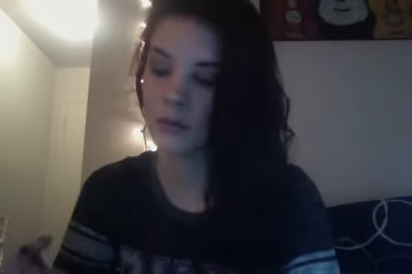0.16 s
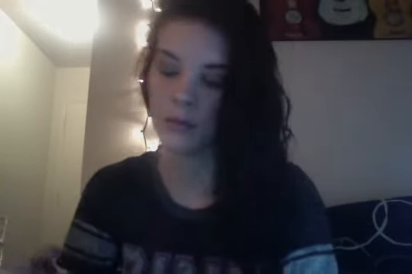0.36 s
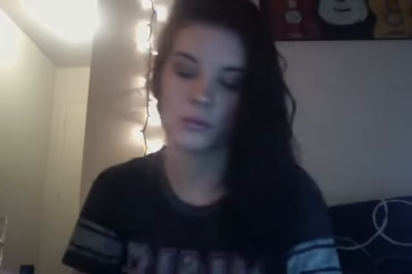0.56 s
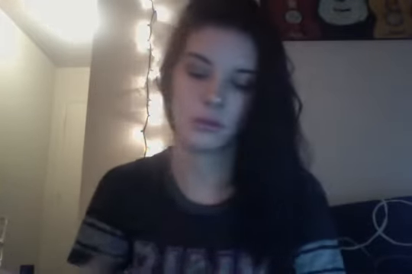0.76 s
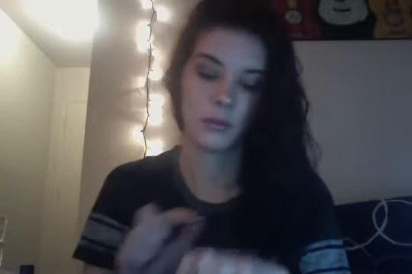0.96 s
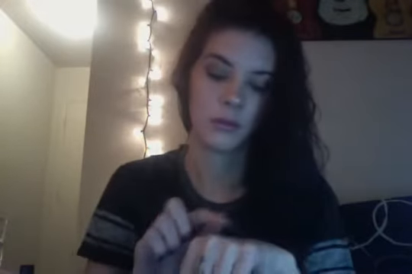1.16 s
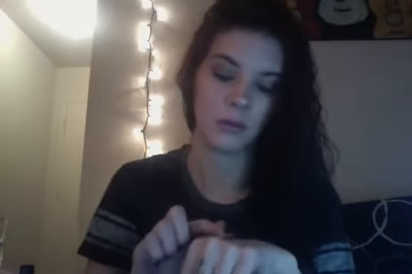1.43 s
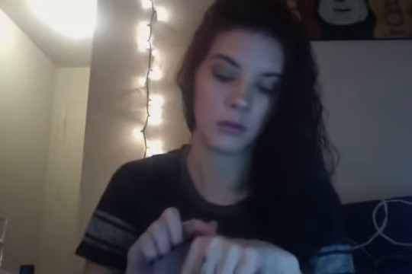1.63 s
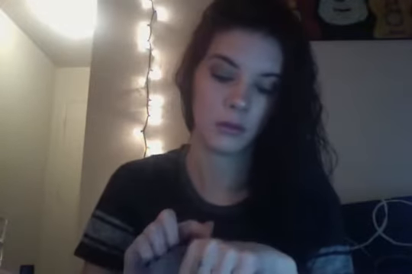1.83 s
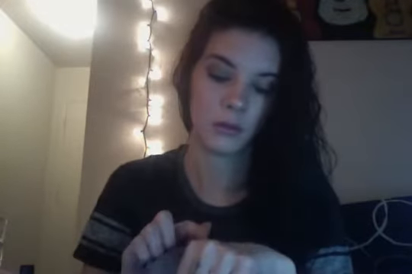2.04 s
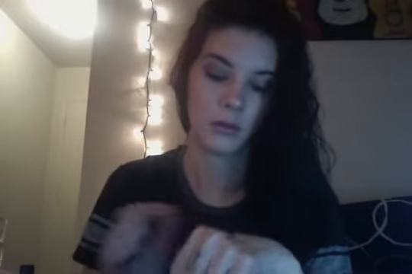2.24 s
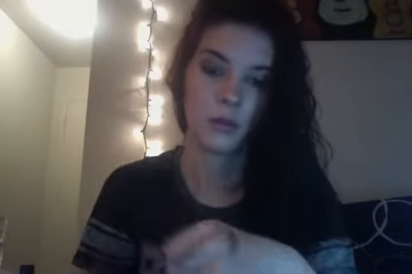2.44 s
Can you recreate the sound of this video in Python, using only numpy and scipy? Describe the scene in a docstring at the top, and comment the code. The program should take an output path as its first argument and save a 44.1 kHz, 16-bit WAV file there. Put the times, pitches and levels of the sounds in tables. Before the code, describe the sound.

Hard plastic cosmetics case knocks on a desk: a bright snapping clatter, a light tap, a second lower clack, all within half a second. Then near silence with faint fan hiss, heard by a laptop microphone in a small room.

```python
"""In a small quiet bedroom a laptop fan whirrs and speeds up: rushing noise plus tones locked to its shaft. Its
electronics hum, whine and give a pulsing peep, all made of sine tones; the peep ends at 2.16 s. At 0.2 s a
plastic make-up palette clacks and rattles on the desk: short contacts ring its parts and the desk. A fingernail
taps another object nearby at 0.36 s, the palette clacks again at 0.52 s, and faint puffs of treble noise rustle
from 1.17 s. The laptop's noise suppressor opens on each clack and closes slowly."""
import sys
import numpy as np
from scipy import signal
from scipy.fft import rfft, irfft
from scipy.io import wavfile
from scipy.ndimage import uniform_filter1d

SR = 44100
rng = np.random.default_rng(int(sys.argv[2]) if len(sys.argv) > 2 else 0)


def dump(signal):
    """Clip the signal to [-1, 1] and save it as 16-bit WAV at the path in sys.argv[1]."""
    limited = np.clip(np.atleast_2d(signal).T, -1, 1)
    pcm = np.round(limited * 32767).astype(np.int16)
    wavfile.write(sys.argv[1], SR, pcm)


def invert_db(level):
    """Linear amplitude ratio for a level in decibels (20 dB per decade), elementwise."""
    return 10 ** (np.asarray(level, dtype=float) / 20)


N = 114660  # length of the sound in samples

# Colour of the fan's rushing air: (frequency [Hz], relative level per Hz [dB])
AIR_COLOUR = [(30, -50.5), (60, -22.5), (101, -6.5), (171, -7.5), (226, -2), (491, -3.5), (615, 0.5),
              (1210, -6.5), (1480, -5.5), (1630, -9.5), (2400, -9), (2900, -11.5), (4300, -16.5),
              (4900, -26), (6200, -24.5), (7100, -29.5), (8300, -24), (9000, -27), (9400, -33.5),
              (12000, -37.5), (16000, -49)]
# Turning speed of the fan shaft: (time [s], turns per second [Hz])
SHAFT_SPEED = [(0, 75.8), (.5, 76.15), (1.3, 76.5), (1.9, 76.85), (2.6, 77.55)]
# Fan tones: (multiple of the shaft speed, level [dB])
FAN_TONES = [(3, -72), (4, -79.5), (8, -72.5), (9, -72.5), (10, -79), (11, -77), (14, -78.5), (19, -71.5),
             (38, -78)]
# Electronic whines: (multiple of WHINE_HZ, level [dB])
WHINE_TONES = [(3, -84), (5, -89), (10, -91), (11, -90.5), (12, -94.5), (13, -91), (14, -85.5), (15, -92),
               (16, -95), (17, -96.5), (18, -93.5), (20, -101)]
# Palette contacts: (time [s], length [ms], desk [dB], case [dB], lid [dB], lid tilt [dB per octave],
# tick [dB], tick tilt [dB per octave])
CONTACTS = [(0.205, 2.8, -58, -54.5, -37.5, -15, -72, 11), (0.2073, 1.2, -29, -10, -7.5, 6, -11.5, 3.5),
            (0.2188, 3.4, -56.5, -49, -36, 3, -19.5, 0), (0.2219, 2.13, -24, -16.5, -11.5, 3.5, -26, -4),
            (.2262, 2.4, -37.5, -18.5, -24, -10, -44, 3.5),
            (.2310, 1.15, -32.5, -33, -19.5, 2.5, -19.5, -4), (0.2341, 2.3, -42, -26, -21.5, 0, -41, 4),
            (.2370, 31, -56.5, -36.5, -44, -3, -48, 2), (.2450, 3., -33, -30, -36, 4, -45, 0),
            (0.2568, 2.8, -40.5, -37.5, -29, -2, -31, -4), (.2638, 3.6, -55, -54, -30.5, 5, -24.5, 2.5),
            (0.269, 1.3, -45, -43, -37, -3, -57, 0), (.2745, 2.7, -44, -45, -42, -2, -43, -2),
            (0.2875, 6.5, -60, -45, -45, 4, -37, -4), (.3030, 4.4, -67, -44, -50, 3, -51, -0.5),
            (0.5193, 1.97, -19.5, -30, -21, -17.5, -22, -7.5),
            (.5230, 24, -67.5, -72.5, -39, -2, -41, -12.5), (.5400, 44, -61.5, -58, -41, -5.5, -48.5, -8),
            (.5290, 1.5, -30.5, -47, -36, -5.5, -48, -4), (0.5325, 2, -25, -52, -40.5, 2.5, -44.5, -4.5),
            (.5460, 3.5, -43.5, -40, -50, -10, -58.5, 1), (.5560, 5., -42.5, -31, -48, -10.5, -64, 1),
            (.5665, 3., -32.5, -40, -55, -7, -47.5, 2.5)]
# Ringing modes of the desk: (frequency [Hz], relative level [dB], 60 dB decay [s])
DESK_MODES = [(238, -17, 0.11), (400, -3.5, 0.0085), (490, 13.5, 0.025), (560, 3.5, 0.017),
              (1200, -17, .01)]
# Ringing modes of the palette's case: (frequency [Hz], relative level [dB], 60 dB decay [s])
CASE_MODES = [(680, -18, .025), (761, -0.5, .04), (851.5, -4.5, 0.028), (1023, -17, 0.028)]
# Ringing modes of its lid: (frequency [Hz], relative level [dB], 60 dB decay [s])
LID_MODES = [(1400, -14, .012), (1620, -3, 0.011), (1850, -3, 0.014), (2160, -4, 0.03), (2380, -5, .011),
             (2667, -3.5, 0.015), (3142, 0, 0.012), (3610, 1, 0.01), (4250, -1.5, 0.0072),
             (4774, -9, 0.008)]
# Ringing modes of its ticking latch: (frequency [Hz], relative level [dB], 60 dB decay [s])
TICK_MODES = [(5007, -5, 0.0064), (5950, -3.5, .008), (6670, -2.5, 0.007), (7397, -1.5, 0.0055),
              (8370, -1.5, 0.0051), (9232, 0, 0.004), (10520, -1.5, .005), (11600, -5, .006),
              (12710, -7, 0.0035), (14690, -7.5, .002)]
# Low desk modes: (frequency [Hz], relative level [dB], 60 dB decay [s])
THUMP_MODES = [(84, 0.59, 0.53), (109, -2.6, 0.098)]
# Latch snaps: (time [s], peak level [dB])
LATCH_SNAPS = [(.2078, 0), (.5202, -20)]
# Modes rung by the fingernail tap on another object: (frequency [Hz], relative level [dB], 60 dB decay [s])
TAP_MODES = [(445, -12, 0.027), (681.5, 1, 0.015), (1843, 0.5, 0.018), (2320, -3, 0.02), (3230, -6, 0.015),
             (4650, -21, 0.028), (6000, -18, 0.013), (11000, -18.5, 0.019)]
# Room tail bands: (frequency [Hz], level [dB], 60 dB decay [s])
ROOM_BANDS = [(400, -31.5, 0.2), (720, -25.5, .21), (1410, -23, .22), (2900, -23.5, .2),
              (5200, -22.5, 0.25), (8000, -26.5, 0.24), (13300, -25, 0.24)]
# Faint treble rustles: (time [s], length [s], frequency [Hz], level [dB])
RUSTLES = [(1.166, 0.028, 8620, -75.5), (1.29, 0.027, 8500, -84), (2.282, 0.03, 8300, -78)]

AIR_DB, SHAFT_WOBBLE = -62, 0.0007  # wobble is a fraction of the speed
WHINE_HZ = 567.43
HUM_HZ, HUM_DB = 120, -80.5
PEEP_HZ, PEEP_DB, PEEP_FLICKER_DB, PEEP_ENDS_S = 8000, -81, 2, 2.16
PEEP_PULSE_HZ, PEEP_ON_SHARE = 15.05, 0.62  # it switches on and off
SCATTER_DB, GRIT_MS = 1.2, 0.2  # spread of mode strengths, memory of the grit
RATTLE_OVER_MS, RATTLE_PER_S, RATTLE_DB = 10, 500, 7  # long contacts break into uneven knocks
BODY_LAG_MS, BODY_PUSH_MS = 1.5, 0.44  # delay and width of the soft push into case and desk
RADIATES_HZ = 287  # below this the palette radiates little
THUMP_DB = -45  # relative to the case and desk levels
SNAP_HZ, SNAP_MS = 6500, 0.065
TAP_S, TAP_MS, TAP_DB = 0.3597, 1.99, -30
ROOM_GAP_MS = 4.0  # time over which the tail fades in
OPEN_DB, CLOSED_DB, HOLD_S, CLOSE_S = -51, -7, 0.046, 0.56  # noise suppressor
RING_SAMPLES, PUSH_SAMPLES = 4096, 2048


def walk(rate):
    """Smooth random wander: levels held for 1 / rate seconds and averaged twice, with a spread near 1."""
    hold = int(SR / rate)
    steps = np.repeat(rng.standard_normal(N // hold + 1), hold)
    return 1.3 * uniform_filter1d(uniform_filter1d(steps, hold), hold)[:N]


def colour(x, hz, db):
    """Shape a spectrum through (Hz, dB) points."""
    f = np.maximum(np.arange(len(x) // 2 + 1) * SR / len(x), 1)
    return irfft(rfft(x) * invert_db(np.interp(np.log(f), np.log(hz), db)), len(x))


def tone(phase, db):
    """Sine with a random starting phase and an rms level in dB."""
    return np.sqrt(2) * invert_db(db) * np.sin(phase + 2 * np.pi * rng.random())


def fan():
    """Rushing air is coloured noise; shaft and blade tones are multiples of one rising, wobbling speed."""
    air = colour(rng.standard_normal(N), *np.array(AIR_COLOUR).T)
    out = air / air.std() * invert_db(AIR_DB + 0.3916 * walk(12))
    speed_hz = np.interp(np.arange(N) / SR, *np.array(SHAFT_SPEED).T) * (1 + SHAFT_WOBBLE * walk(7.9))
    turn = 2 * np.pi * np.cumsum(speed_hz) / SR
    for multiple, db in FAN_TONES:
        out = out + tone(multiple * turn, db)
    return out


def electronics():
    """Steady whines at multiples of one pitch, a pulsing peep, and mains hum with a wandering level."""
    t, whines = np.arange(N) / SR, 0
    for multiple, db in WHINE_TONES:
        whines = whines + tone(2 * np.pi * multiple * WHINE_HZ * t, db)
    peep = tone(2 * np.pi * PEEP_HZ * t + 0.5 * walk(60), PEEP_DB - PEEP_FLICKER_DB * walk(35))
    pulse = np.cos(2 * np.pi * PEEP_PULSE_HZ * t) - np.cos(np.pi * PEEP_ON_SHARE)
    ending = np.clip((PEEP_ENDS_S - t) / 0.03, 0, 1)
    hum = tone(2 * np.pi * HUM_HZ * t, HUM_DB + 3.9 * walk(5))
    return whines + peep * np.clip(4 * pulse, 0, 1) * ending + hum


def push_shape(k, ms):
    """Force over time k in ms: an arch of the given length, uneven if long, or for ms = 0 a soft late push."""
    knocks = rng.standard_normal(64)[(k * RATTLE_PER_S / 1000).astype(int)]
    if ms == 0:
        return np.exp(-0.5 * ((k - BODY_LAG_MS) / (BODY_PUSH_MS / 4)) ** 2)
    arch = np.sin(np.pi * np.clip(k / ms, 0, 1))
    return arch * invert_db(RATTLE_DB * knocks) if ms > RATTLE_OVER_MS else arch


def ring(modes, ms=0, tilt_db=0):
    """Fading modes of scattered strength, each shaken by its own grit, or all by one soft push; peak 1."""
    t, total = np.arange(RING_SAMPLES) / SR, 0
    k = t[:PUSH_SAMPLES] * 1000  # time in ms
    shape = push_shape(k, ms)
    smoother = np.hanning(int(4 * GRIT_MS * SR / 1000))
    for hz, db, t60 in modes:
        scatter, *noise = rng.standard_normal(PUSH_SAMPLES + 1)
        grit = signal.fftconvolve(noise, smoother, "same")
        carrier = np.cos(2 * np.pi * hz * k / 1000 + noise[0])  # the first noise value also sets the phase
        push = shape * grit * carrier if ms else shape
        fading_sine = np.exp(-np.log(1000) * t / t60) * np.sin(2 * np.pi * hz * t)
        one = signal.fftconvolve(fading_sine, push)[:len(t)]
        level_db = db + SCATTER_DB * scatter + tilt_db * np.log2(hz / modes[0][0])
        total = total + one / np.abs(one).max() * invert_db(level_db)
    return total / np.abs(total).max()


def palette():
    """Each contact puts grit into lid and latch, then a softer push into case and desk; little bass radiates."""
    out, low, t = np.zeros(N), np.zeros(N), np.arange(N) / SR
    fade = np.cos(np.linspace(0, np.pi / 2, RING_SAMPLES))
    for s, ms, desk_db, case_db, lid_db, lid_tilt_db, tick_db, tick_tilt_db in CONTACTS:
        span = slice(int(s * SR), int(s * SR) + RING_SAMPLES)
        out[span] += invert_db(desk_db) * ring(DESK_MODES) + invert_db(case_db) * ring(CASE_MODES)
        out[span] += invert_db(lid_db) * ring(LID_MODES, ms, lid_tilt_db)
        out[span] += invert_db(tick_db) * ring(TICK_MODES, ms, tick_tilt_db)
        thump_gain = (invert_db(case_db) + 2.5 * invert_db(desk_db)) * invert_db(THUMP_DB)
        low[span] += thump_gain * ring(THUMP_MODES, 3.3) * fade
    out = out + latch_snaps(t)
    tap = int(TAP_S * SR)
    out[tap:tap + RING_SAMPLES] += nail_tap()
    bass_cut = signal.butter(3, RADIATES_HZ, "highpass", fs=SR, output="sos")
    return signal.sosfilt(bass_cut, out) + low


def latch_snaps(t):
    """Each snap is a very short smooth burst of a treble tone."""
    out = np.zeros(N)
    for s, db in LATCH_SNAPS:
        burst = np.exp(-((t - s) * 1000 / SNAP_MS) ** 2)
        out += invert_db(db) * np.cos(2 * np.pi * SNAP_HZ * (t - s)) * burst
    return out


def room(x):
    """Diffuse echoes: bands of noise that fade in quickly and die away, each at its own rate."""
    t, tail = np.arange(SR // 2) / SR, 0
    for hz, db, t60 in ROOM_BANDS:
        band_pass = signal.butter(2, [hz / 1.3, min(hz * 1.4, 20000)], "bandpass", fs=SR, output="sos")
        band = signal.sosfilt(band_pass, rng.standard_normal(len(t)))
        fade = np.exp(-np.log(1000) * t / t60) * np.clip(t * 1000 / ROOM_GAP_MS, 0, 1) ** 2
        tail = tail + invert_db(db) * band / band.std() * fade / np.sqrt(np.sum(fade ** 2))
    return x + signal.fftconvolve(x, tail)[:N]


def nail_tap():
    """One fingernail tap on another object rings its own set of modes through a short gritty contact."""
    return invert_db(TAP_DB) * ring(TAP_MODES, TAP_MS)


def rustles():
    """Short faint puffs of narrow treble noise."""
    t, out = np.arange(N) / SR, 0
    for s, length, hz, db in RUSTLES:
        band_pass = signal.butter(2, [hz * 0.95, hz * 1.05], "bandpass", fs=SR, output="sos")
        noise = signal.sosfilt(band_pass, rng.standard_normal(N))
        out = out + invert_db(db) * noise / noise.std() * np.exp(-((t - s) / (length / 2)) ** 2)
    return out


def scene():
    """Palette in the room over the laptop's own noise and the rustles, as one channel."""
    return (room(palette()) + fan() + electronics() + rustles())[None]


def roll_off(x):
    """The treble ends steeply here."""
    return signal.sosfilt(signal.butter(12, 16540, fs=SR, output="sos"), x)


def record(dry):
    """The suppressor opens above a threshold, holds, then sinks back; both ends of the range are cut."""
    t = np.arange(N) / SR
    power = uniform_filter1d(dry[0] ** 2, size=221, origin=40)  # 5 ms average, leaning to the past
    loud = power > invert_db(OPEN_DB) ** 2
    since = t - np.maximum.accumulate(np.where(loud, t, -9))  # seconds since last loud; starts closed
    gain_db = uniform_filter1d(CLOSED_DB * np.clip((since - HOLD_S) / CLOSE_S, 0, 1), 88)
    x = signal.sosfilt(signal.butter(2, 90, "highpass", fs=SR, output="sos"), dry * invert_db(gain_db))
    x = signal.sosfilt(signal.butter(4, 15800, "lowpass", fs=SR, output="sos"), x)
    return roll_off(x)


dry = scene()
out = record(dry)
dump(out)
```